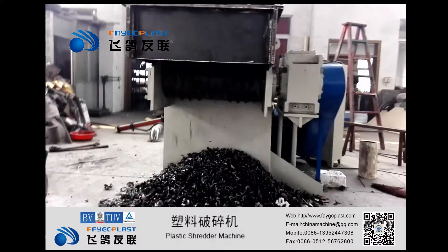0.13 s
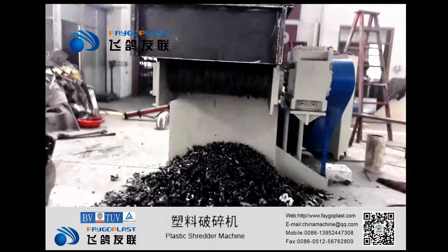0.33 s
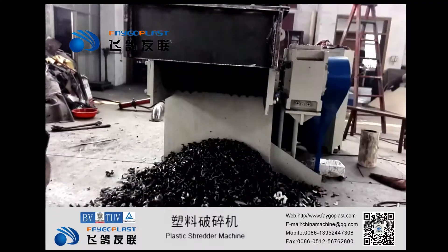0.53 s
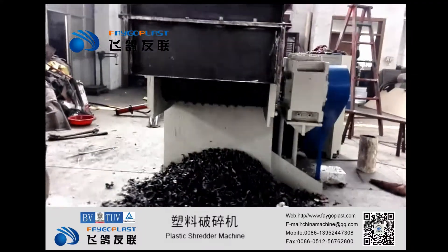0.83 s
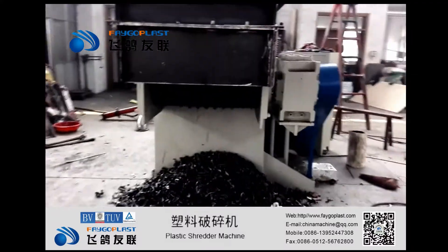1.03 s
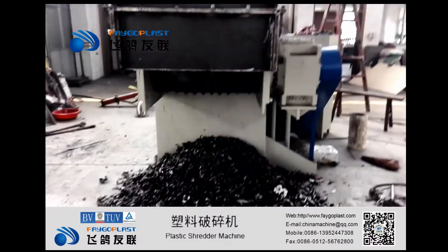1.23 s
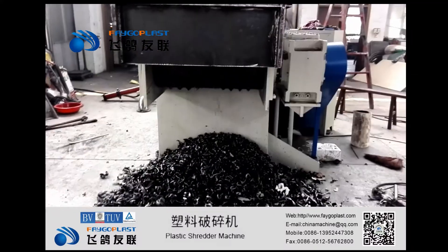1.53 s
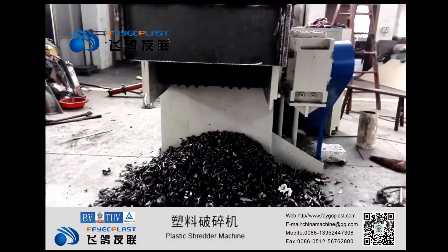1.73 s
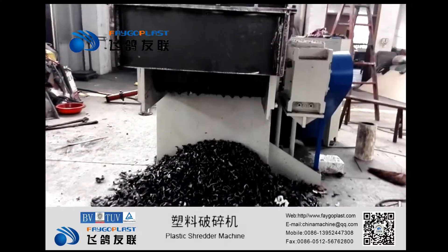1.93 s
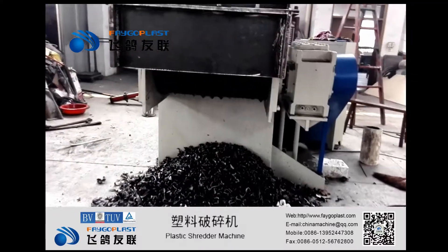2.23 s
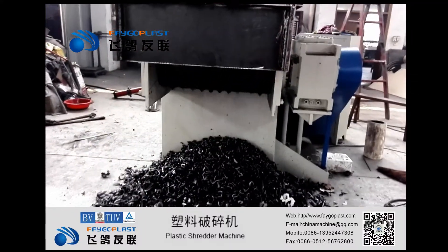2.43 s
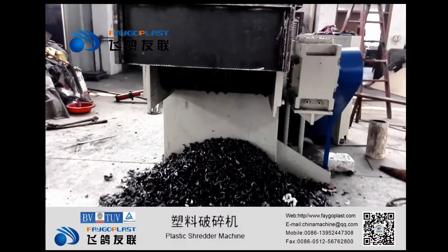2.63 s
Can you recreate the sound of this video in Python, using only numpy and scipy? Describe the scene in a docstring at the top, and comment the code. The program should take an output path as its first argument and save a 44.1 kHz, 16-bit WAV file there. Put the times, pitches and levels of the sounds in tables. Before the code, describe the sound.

A plastic shredder rumbles and crunches scrap, with thuds, sharp cracks and hissing chips.

```python
"""A plastic granulator in a hard-walled workshop, a few metres from the microphone.
From the start scrap drums on the steel hopper, the knives crunch, the rotor hums and cut flakes spray
from the chute. Big pieces thud, boom and crack throughout. Just before 2 s the heaviest thud clips
the microphone, and a gush of chips slides down the heap, its hiss sinking as the machine runs on."""
import sys
import numpy as np
from scipy import signal
from scipy.fft import rfft, irfft, next_fast_len
from scipy.io import wavfile
from scipy.ndimage import uniform_filter1d, map_coordinates

SR = 44100
rng = np.random.default_rng(int(sys.argv[2]) if len(sys.argv) > 2 else 0)


def unload_audio(sound):
    """Save the sound as a 16-bit wav file, at the path given as the first command line argument."""
    columns = np.transpose(np.atleast_2d(sound))
    # keep every value between -1 and 1, then stretch to whole-number steps
    steps = np.round(np.clip(columns, -1, 1) * 32767)
    wavfile.write(sys.argv[1], SR, steps.astype(np.int16))


N = 122157

# Levels in the tables are relative; balance is left minus right.
# how hard the scrap drums on the hopper (time [s], level [dB])
HOPPER_LOAD = [(0, -24), (.2, -19), (.3, -20), (.44, -26), (.57, -19.5), (.69, -26), (.77, -18), (.9, -27),
               (1.01, -18), (1.06, -22.5), (1.2, -21), (1.49, -17.5), (1.72, -22.5), (1.9, -16.5),
               (2.0, -15), (2.22, -21), (2.34, -19), (2.62, -18.5), (2.77, -22)]
# spectrum of the hopper's rumble (frequency [Hz], level [dB])
RUMBLE_SPECTRUM = [(30, -33), (50, -34), (75, -10.5), (130, -9.5), (190, 0), (280, -0.5), (330, -4.5),
                   (420, -7), (600, -27), (1200, -35.5)]
# the hopper's panel modes (frequency [Hz], level [dB], t60 [s])
HOPPER_MODES = [(193.8, 1.5, 0.26), (250.7, -6.5, 0.39), (268.7, 1, 0.17), (383.8, -5.5, 0.28),
                (437.4, -4.5, 0.18), (510, -7.5, 0.27), (611.5, -8.5, 0.25), (728, -4.5, 0.18)]
# heavy pieces hit the hopper (time [s], level [dB], push frequency [Hz])
THUDS = [(0.197, -9.5, 120.6), (0.236, -7.5, 164.6), (0.769, -12, 411), (1.138, -15, 228), (1.956, -4, 157),
         (1.968, -16.5, 403), (2.046, -7.5, 172), (2.332, -11.5, 190), (2.525, -12, 246),
         (2.736, -4.5, 378), (2.745, -7.5, 194)]
# big pieces jam against the knives and set the hopper booming (time [s], length [s], lower mode [dB], upper
# mode [dB])
BOOMS = [(0, .1, -15.5, -16.5), (.115, .085, -18, -12.5), (.53, .1, -18.5, -14.5), (1.475, .06, -14, -24),
         (1.94, .06, -9, -10), (2.035, .075, -15, -12.5), (2.27, .1, -18, -27)]
# how much the knives are crushing (time [s], level [dB])
CRUSH_LEVEL = [(0, -22.5), (.1, -24), (.22, -23), (.36, -29.5), (.47, -24), (.6, -25), (.7, -32.5),
               (.79, -22), (.91, -33.5), (1.01, -24), (1.08, -30), (1.22, -28.5), (1.39, -21.5),
               (1.52, -23.5), (1.75, -26.5), (1.9, -28), (1.98, -27), (2.12, -24.5), (2.24, -26.5),
               (2.42, -20), (2.61, -23.5), (2.77, -20.5)]
# spectrum of crushed plastic (frequency [Hz], level [dB])
CRUNCH_SPECTRUM = [(200, -20), (450, 0), (750, 2.5), (1020, -2.5), (1300, -5.5), (2000, -5.5), (2700, -9.5),
                   (4000, -14), (6000, -20.5), (10500, -37)]
# pieces snap (time [s], level [dB], centre [Hz], width [octaves], decay [ms], balance [dB])
CRACKS = [(0.036, -22.5, 5500, 0.7, 6, -2), (.135, -22, 5960, .8, 5.7, 3), (0.176, -19, 1330, 0.21, 6, -1),
          (.189, -15, 820, 0.51, 6, -3), (0.241, -18.5, 980, .7, 7, 2.5), (0.443, -25, 2320, 1.3, 9, 0),
          (.548, -19.5, 7200, 0.5, 14, 4.5), (0.583, -23.5, 1010, 1.2, 12, 5),
          (0.597, -22, 6150, 0.57, 17, 0.5), (0.738, -24.5, 1700, 1.8, 5.3, 3),
          (0.765, -14.5, 6500, 0.48, 6.4, 4), (.765, -19.5, 1690, 1.4, 13, -3),
          (.803, -21.5, 3550, 1.3, 16, 0), (.980, -22.5, 2140, 0.86, 41, -1),
          (1.108, -9.5, 2290, 0.78, 6.5, 0), (1.111, -22.5, 6000, 0.61, 16, 3.5),
          (1.293, -21.5, 2380, .7, 8.1, -4), (1.388, -22.5, 1460, 0.61, 6.7, -2),
          (1.428, -10, 2530, 0.19, 3.7, -2), (1.478, -19.5, 6100, 0.78, 26, 5.5),
          (1.924, -16, 1410, 0.56, 20, 0.5), (1.948, -15, 760, 1.18, 34, -1),
          (2.045, -25.5, 1200, 0.66, 40, -4), (2.148, -18, 2080, 0.9, 18, -1),
          (2.177, -22.5, 2100, 0.93, 4.6, -4), (2.279, -10.5, 2250, 0.59, 8.4, -2),
          (2.281, -10, 4000, 0.72, 10.4, 1.5), (2.324, -17, 4200, 0.82, 12, 0),
          (2.396, -19, 2680, 0.87, 15, -1), (2.523, -19.5, 1850, 0.76, 19, -2),
          (2.643, -21, 3100, 1.1, 5.6, 0.5), (2.694, -22.5, 2070, 0.42, 25, -4)]
# modes of the steel cutting chamber (frequency [Hz], level [dB])
CHAMBER_MODES = [(1030, 3.5), (1360, 5), (1513, -1.5), (1710, -4), (2190, -0.5), (2640, -0.5), (3100, -9),
                 (3720, -1), (5500, -7.5)]
# the rotor's drone (time [s], level [dB])
DRONE_LEVEL = [(0, -23.5), (.22, -26), (.42, -31.5), (.65, -24), (.88, -43), (.99, -25), (1.08, -40),
               (1.14, -20.5), (1.23, -36.5), (1.45, -23), (1.64, -25), (1.7, -37), (1.8, -30), (2.0, -25.5),
               (2.4, -30), (2.77, -26.5)]
# partials of the drone (frequency [Hz], level [dB])
DRONE_PARTIALS = [(74, -16), (96.5, -9), (111, -11.5), (137, -10)]
# flow of fine flakes and of coarse chips (time [s], level [dB])
FLAKE_FLOW = [(0, -31.5), (.2, -31.5), (.45, -35.5), (.62, -35), (.72, -35.5), (.87, -32.5), (1.06, -37),
              (1.3, -33), (1.55, -33.5), (1.9, -35.5), (2.2, -39.5), (2.58, -42.5), (2.77, -31.5)]
CHIP_FLOW = [(0, -29), (.2, -33.5), (.36, -34.5), (.5, -39.5), (.64, -27.5), (.71, -31.5), (.86, -28.5),
             (1.06, -32), (1.2, -31.5), (1.55, -32.5), (1.8, -41), (2.05, -29), (2.35, -36.5),
             (2.58, -39.5), (2.77, -30.5)]
# spectra of the flakes and of the chips (frequency [Hz], level [dB])
FLAKE_SPECTRUM = [(3000, -40), (5500, -3.5), (7000, 0), (8300, 2), (9300, 4.5), (10500, -4.5)]
CHIP_SPECTRUM = [(1200, -2.5), (2600, -5.5), (4000, -6), (5500, -1), (7000, -5.5), (8500, -12.5),
                 (10500, -36)]
# where the spray sits in the stereo image (frequency [Hz], balance [dB])
SPRAY_BALANCE = [(2000, -7.5), (4000, 4.5), (6500, 4.5), (8000, 16.5), (10000, -4)]
# likeness of left and right at the microphone (frequency [Hz], correlation [0-1])
STEREO_LIKENESS = [(100, 0.96), (250, 0.98), (500, 0.82), (1000, 0.59), (2000, 0.36), (4000, 0.027),
                   (9000, 0.024)]
# the workshop's reverberation (frequency [Hz], t60 [s])
ROOM_T60 = [(150, 0.93), (1500, 0.56), (9000, 0.94)]

BOOM_HZ = (193.45, 268.3)  # the two booming panel modes
THUD_DECAY_S, THUD_WIDTH_OCT = 0.018, 0.29
KNIFE_HZ, KNIFE_DECAY_S = 25.48, 0.027
CRACK_ATTACK_S, PING_DECAY_S, SPLINTER_DECAY_S = 0.0008, 0.007, 0.025
CLACKS_PER_S, CLACK_TICK_DECAY_S, CLACK_RING_DECAY_S = 45, 0.011, 0.022
SLIDE_START_S, SLIDE_LENGTH_S = 1.93, 1
SLIDE_FROM_HZ, SLIDE_TO_HZ, SLIDE_HALF_WIDTH_HZ = 6700, 5030, 1500
LOW_SHELF_HZ, TOP_HZ, CEILING = 65, 10650, 0.9


def drumming(cuts):
    """Tumbling scrap shakes the hopper: a dull rumble and its ringing panels."""
    rumble = stereo(grit(N, spread_db=0.5) * cuts, lambda hz: gain_at(RUMBLE_SPECTRUM, hz))
    lead = SR // 2  # the panels are already ringing at the start
    shaking = np.pad(grit(N, spread_db=2.5) * cuts, ((0, 0), (lead, 0)), "reflect")
    panels = signal.fftconvolve(shaking, hopper_ring()[None], axes=1)[:, lead:lead + N]
    return level(HOPPER_LOAD) * (amp(-1) * rumble + amp(-2.5) * stereo(panels))


def hopper_ring(colour=lambda hz: 1):
    """The hopper's panels ring after one blow, modes weighted by colour(Hz)."""
    t = np.arange(SR // 2) / SR
    return sum(colour(hz) * amp(db + rng.normal(0, 3.2) - 60 * t / t60) * np.sin(2 * np.pi * hz * t)
               for hz, db, t60 in HOPPER_MODES)


def thuds():
    """A heavy piece gives the hopper one short push and leaves it ringing."""
    out, t = np.zeros(N), np.arange(SR // 2) / SR
    attack = 1 - np.exp(-t / 0.004)
    for start, db, hz in THUDS:
        push = np.sin(2 * np.pi * hz * t) * np.exp(-t / THUD_DECAY_S)
        panels = hopper_ring(lambda f: hump(f, hz, THUD_WIDTH_OCT))
        add(out, start, amp(db) * attack * (amp(0.5) * push + amp(-7.5) * panels))
    return out


def booms():
    """A big piece jams against the knives and keeps the hopper's two strongest modes booming."""
    out = np.zeros(N)
    for start, length, *levels_db in BOOMS:
        t = np.arange(int(length * SR)) / SR
        modes = sum(amp(db) * np.sin(2 * np.pi * (hz * t + rng.random()) + 0.16 * wobble(31)[:len(t)])
                    for hz, db in zip(BOOM_HZ, levels_db))
        add(out, start, modes * arch(t / length))
    return out


def knives():
    """Force of the cuts: one bite for each passing knife, no two alike."""
    passes = np.arange(N) / SR * KNIFE_HZ
    strength = amp(rng.uniform(-4.5, 3, size=256))[passes.astype(int)]
    since_cut = (passes % 1) / KNIFE_HZ
    bites = strength * np.exp(-since_cut / KNIFE_DECAY_S)
    return unit(0.87 + uniform_filter1d(bites, size=64))


def crunching(cuts):
    """Every cut crushes plastic in a burst of small fractures."""
    crunch = stereo(grit(N, spread_db=0.5) * cuts, lambda hz: gain_at(CRUNCH_SPECTRUM, hz))
    return amp(0.7) * level(CRUSH_LEVEL) * crunch * pan(-0.5)


def cracks():
    """A brittle piece snaps, strikes a short ping from the chamber and scatters splinters in it."""
    out, t = np.zeros((2, N)), np.arange(SR // 4) / SR
    attack = 1 - np.exp(-t / CRACK_ATTACK_S)
    splinters = amp(-10.5) * np.exp(-t / SPLINTER_DECAY_S)
    count = len(CHAMBER_MODES)
    for start, db, centre, width, decay_ms, balance_db in CRACKS:
        envelope = np.exp(-1000 * t / decay_ms) + splinters
        burst = envelope * stereo(grit(len(t), spread_db=3), lambda hz: hump(hz, centre, width))
        phases = 2 * np.pi * rng.random((count, 1, 1)) + 0.5 * rng.standard_normal((count, 2, 1))
        steel = 0
        for (hz, mode_db), phase in zip(CHAMBER_MODES, phases):
            pitch = hz * (1 + rng.uniform(-0.0274, 0.02))  # no two pieces ring quite alike
            steel += hump(hz, centre, width) * amp(mode_db) * np.sin(2 * np.pi * pitch * t + phase)
        ping = amp(-0.5) * steel * np.exp(-t / PING_DECAY_S)
        add(out, start, amp(db - 0.5) * pan(balance_db) * attack * (burst + ping))
    return out


def clacks():
    """Small bits fly off the knives at random and clack on the chamber walls."""
    out, t = np.zeros((2, N)), np.arange(SR // 20) / SR
    hz, mode_db = np.transpose(CHAMBER_MODES)
    for k in range(int(CLACKS_PER_S * N / SR)):
        start, size = (k + rng.random()) / CLACKS_PER_S, rng.exponential() ** 0.5
        weights = amp(mode_db) * rng.standard_normal((2, len(hz)))
        pitches = hz[:, None] * (1 + rng.uniform(-0.123, 0.12))
        ring = unit(weights @ np.sin(2 * np.pi * pitches * t)) * np.exp(-t / CLACK_RING_DECAY_S)
        tick = 2 * rng.standard_normal((2, len(t))) * np.exp(-t / CLACK_TICK_DECAY_S)
        add(out, start, size * (ring + tick))
    return amp(-4.5) * level(CRUSH_LEVEL) * stereo(out, lambda f: gain_at(CRUNCH_SPECTRUM, f))


def rotor():
    """The low, slightly unsteady drone of rotor and drive."""
    drone, t = np.zeros(N), np.arange(N) / SR
    for hz, db in DRONE_PARTIALS:
        gain = amp(db + 1.93 * wobble(6.56))
        drone += gain * np.sin(2 * np.pi * (hz * t + rng.random()) + 0.7 * wobble(5.79))
    return amp(-1.5) * level(DRONE_LEVEL) * unit(drone)


def spray():
    """Fine flakes and coarser chips rattle down the chute onto the heap."""
    flutter = amp(1.3 * wobble(34.14))
    flakes = stereo(grit(N, spread_db=1) * flutter, lambda hz: gain_at(FLAKE_SPECTRUM, hz))
    chips = stereo(grit(N, spread_db=2) * flutter, lambda hz: gain_at(CHIP_SPECTRUM, hz))
    flow = amp(0.5) * (level(FLAKE_FLOW) * flakes + level(CHIP_FLOW) * chips)
    return filtered(flow, lambda hz: pan(along(SPRAY_BALANCE, hz)))


def slide():
    """Left of the microphone, sliding chips hiss in one band that sinks as they slow down."""
    progress = np.clip((np.arange(N) / SR - SLIDE_START_S) / SLIDE_LENGTH_S, 0, 1)
    centre_hz = SLIDE_FROM_HZ + (SLIDE_TO_HZ - SLIDE_FROM_HZ) * progress
    phase = 2 * np.pi * np.cumsum(centre_hz) / SR
    band = lambda: filtered(grit(N, spread_db=4), lambda hz: 1 / (1 + (hz / SLIDE_HALF_WIDTH_HZ) ** 4))
    hiss = unit(band() * np.cos(phase) + band() * np.sin(phase))
    return amp(-33.5) * arch(progress) * hiss * pan(9)


def workshop(x):
    """The hard walls return a diffuse tail that dies soonest in the midrange."""
    hz, t, noise = signal.stft(rng.standard_normal((2, SR // 2)), SR, nperseg=256)
    decay = amp(-60 * t / along(ROOM_T60, hz)[:, None])
    tail = stereo(signal.istft(noise * decay, SR, nperseg=256)[1])
    return signal.fftconvolve(x, tail / np.linalg.norm(tail[0]), axes=1)[:, :N]


def grit(n, spread_db):
    """Dense tiny fractures: two noises whose size jumps every millisecond."""
    size = np.repeat(rng.standard_normal(n // 44 + 1), 44)[:n]
    return unit(rng.standard_normal((2, n)) * amp(spread_db * size))


def stereo(pair, colour=lambda hz: 1):
    """Two unrelated signals become a coloured stereo one of rms 1: mono bass, wide treble."""
    def mid_side_gains(hz):
        angle = np.arccos(along(STEREO_LIKENESS, hz)) / 2
        return colour(hz) * np.array([np.cos(angle), np.sin(angle)])
    mid, side = filtered(pair, mid_side_gains)
    return unit(np.array([mid + side, mid - side]))


def pan(balance_db):
    """Left and right gains."""
    return amp(np.array([[0.5], [-0.5]]) * balance_db)


def filtered(x, response):
    """x through a gain of response(Hz)."""
    n = x.shape[-1]
    m = next_fast_len(n + n // 4)
    return irfft(rfft(x, m) * response(np.fft.rfftfreq(m, 1 / SR)), m)[..., :n]


def hump(hz, centre_hz, width_oct):
    """A broad spectral peak."""
    return 1 / (1 + (np.log2((hz + 1) / centre_hz) / width_oct) ** 2 / 2) ** 2


def along(rows, hz):
    """(frequency, value) rows interpolated on a log axis."""
    freqs, values = np.transpose(rows)
    return np.interp(np.log(hz + 1), np.log(freqs + 1), values)


def gain_at(spectrum, hz):
    """A spectrum's gain at hz."""
    return amp(along(spectrum, hz))


def level(rows):
    """Gain per sample from (time [s], level [dB]) rows."""
    return amp(np.interp(np.arange(N) / SR, *np.transpose(rows)))


def arch(progress):
    """A swell and fade as progress runs from 0 to 1."""
    return np.sqrt(np.abs(np.sin(np.pi * progress)))


def wobble(rate):
    """A smooth random curve, rate knots a second."""
    return map_coordinates(rng.standard_normal(1024), [np.arange(N) * rate / SR], mode="wrap")


def amp(db):
    """Decibels to gain."""
    return 10 ** (np.asarray(db) / 20)


def unit(x):
    """Scaled to rms 1."""
    return x / np.sqrt(np.mean(x ** 2) + 1e-20)


def add(out, start_s, x):
    """Mix x in at start_s."""
    i = round(start_s * SR)
    out[..., i:i + x.shape[-1]] += x[..., :max(N - i, 0)]


def scene():
    """The machine from a few metres away, its blows echoing in the workshop."""
    cuts, snaps, bumps = knives(), cracks(), thuds()
    echo = workshop(amp(-3.5) * snaps + amp(-21.5) * bumps)
    machine = rotor() + drumming(cuts) + booms() + crunching(cuts) + clacks() + snaps + bumps
    return machine + spray() + slide() + echo


def record(dry):
    """The microphone sheds deep bass, rounds off peaks near full scale and cuts the top treble."""
    thin = filtered(dry, lambda hz: amp(-19.5) + 0.8 / (1 + (LOW_SHELF_HZ / (hz + 1)) ** 10))
    clipped = thin / (1 + np.abs(thin / CEILING) ** 8) ** (1 / 8)
    return filtered(clipped, lambda hz: hz < TOP_HZ)


dry = scene()
out = record(dry)
unload_audio(out)
```